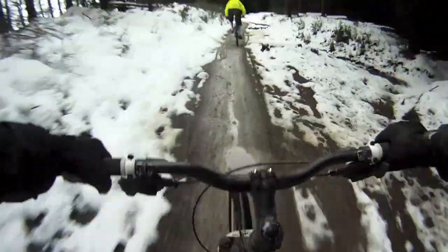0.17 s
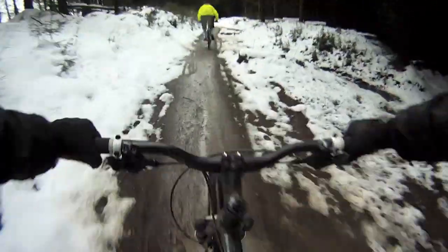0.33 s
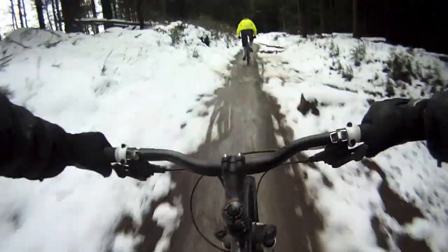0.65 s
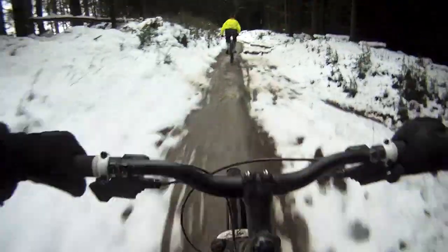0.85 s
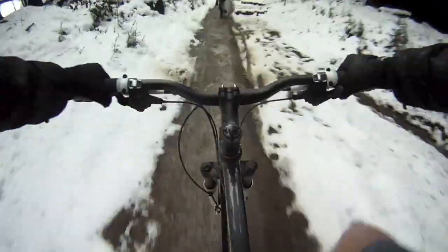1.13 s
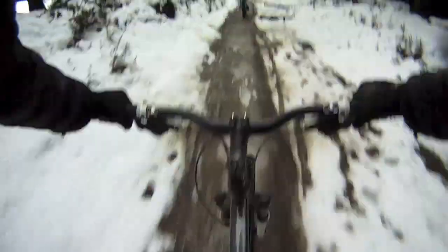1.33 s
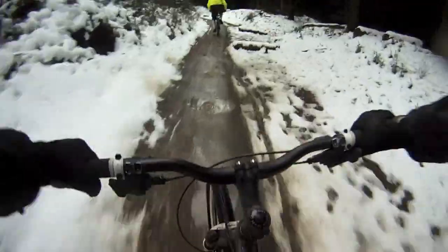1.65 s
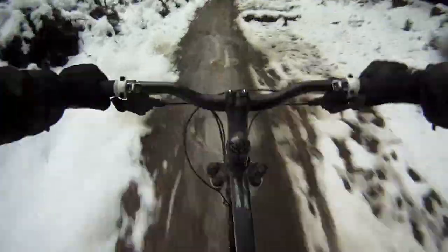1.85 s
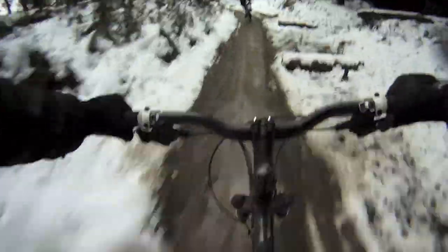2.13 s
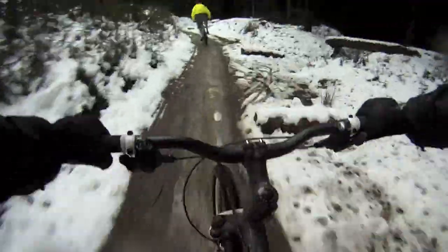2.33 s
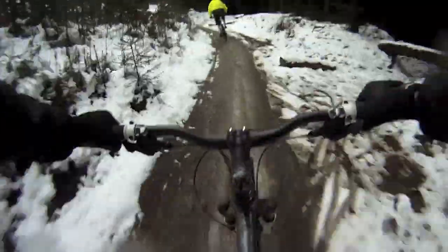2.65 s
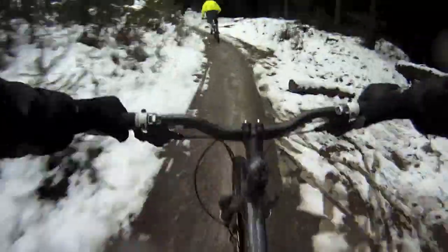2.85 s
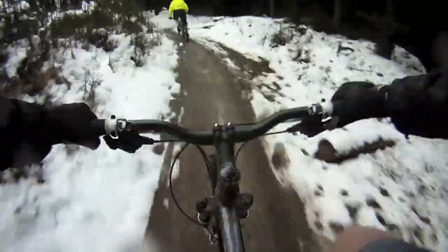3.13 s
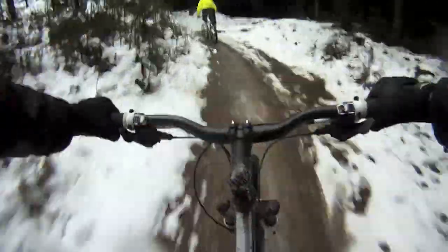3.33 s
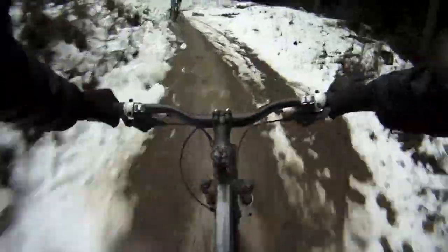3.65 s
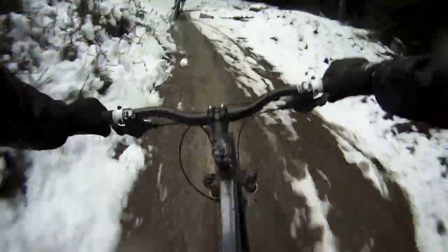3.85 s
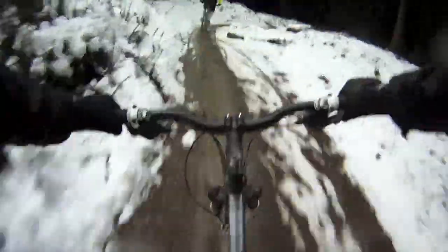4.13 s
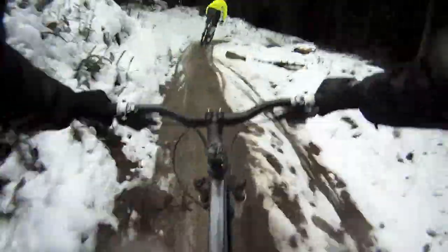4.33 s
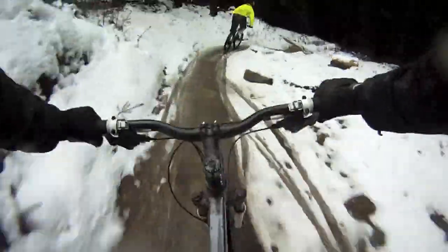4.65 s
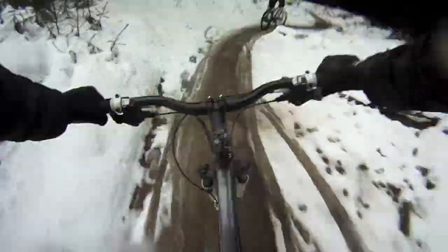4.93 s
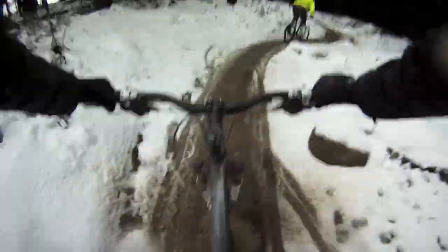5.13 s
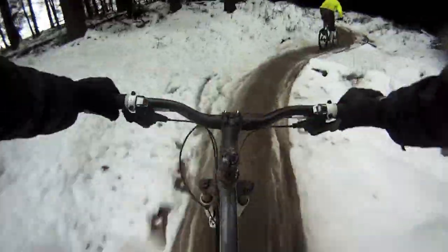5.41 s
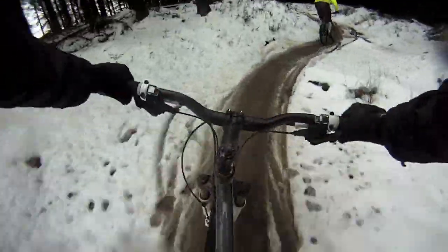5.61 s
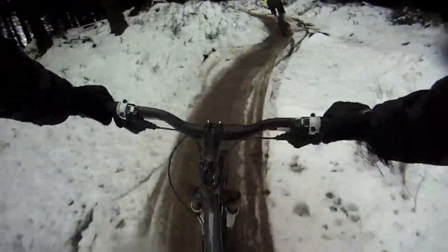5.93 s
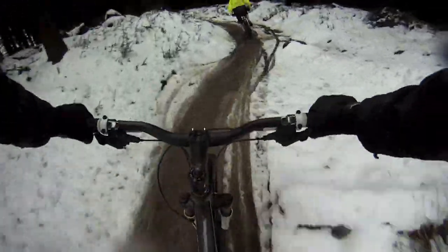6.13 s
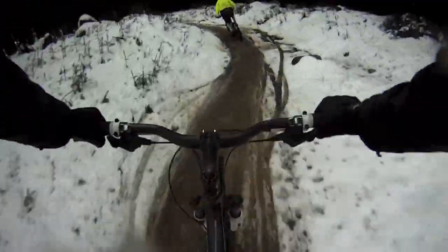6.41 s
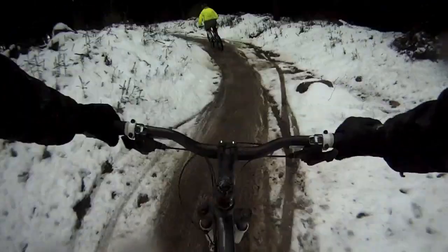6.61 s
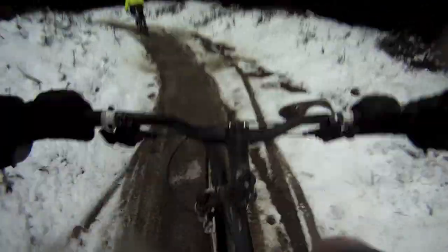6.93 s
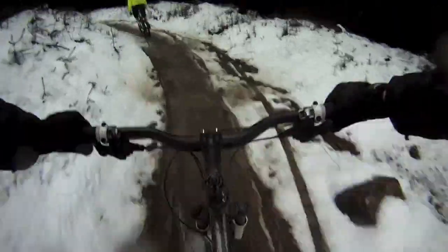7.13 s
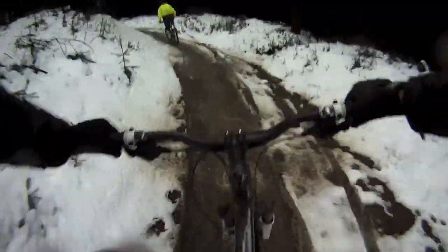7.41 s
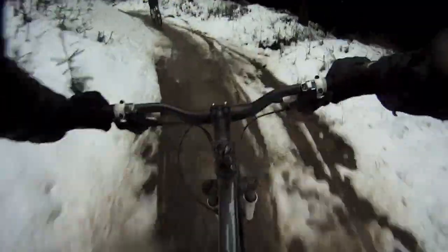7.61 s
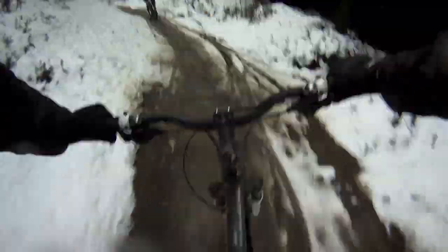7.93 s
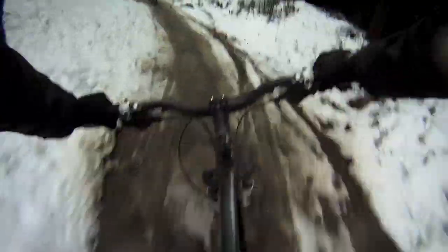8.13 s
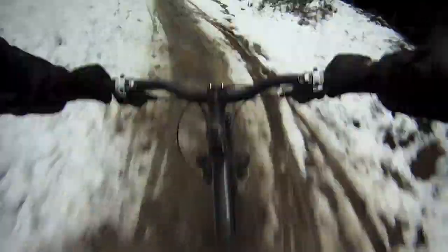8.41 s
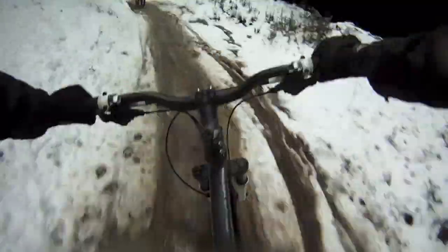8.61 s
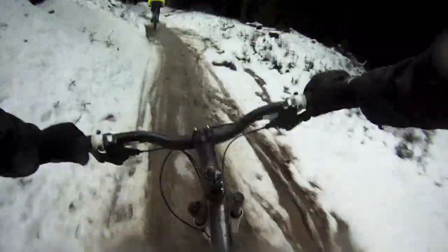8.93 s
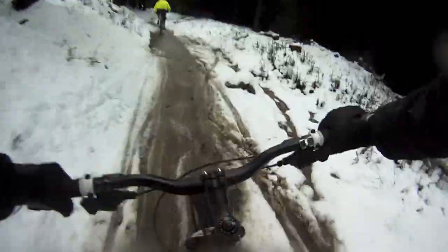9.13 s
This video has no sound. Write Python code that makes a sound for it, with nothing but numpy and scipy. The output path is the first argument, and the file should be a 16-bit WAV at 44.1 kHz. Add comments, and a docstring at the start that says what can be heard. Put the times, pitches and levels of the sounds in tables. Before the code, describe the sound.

A mountain bike rattles down a slushy trail, tyres crunching and spraying wet snow, its camera case clacking, then knocking hard over rough bumps.

```python
"""A mountain bike rolls down a slushy trail for nine seconds, heard from a cased camera on the rider's chest.
First the tyres crunch under light clacks; a hard knock comes at 2.6 s, and the wind swells after 3 s.
The ride quietens before 6 s, then wet spray surges; hard jolts and the hardest knocks fill 6.9 to 9 s.
Contacts are sums of damped modes, snow is random grains through filters, wind is filtered noise with
pressure swings, padded bumps are decaying sines; gain control and soft overload act on the sum."""
import sys
import numpy as np
from scipy import signal
from scipy.fft import rfft, irfft, next_fast_len
from scipy.io import wavfile

SR = 44100
rng = np.random.default_rng(int(sys.argv[2]) if len(sys.argv) > 2 else 0)


def persist_wave(psi):
    """Save psi, clipped to +-1, as 16-bit WAV."""
    counts = np.round(np.clip(psi, -1, 1) * 32767).astype(np.int16)
    wavfile.write(sys.argv[1], SR, np.atleast_2d(counts).T)


N = 408366
TIME = np.arange(N) / SR
# Table levels are relative; clacks, knocks, ticks, clinks, rolling and wind are trimmed where they are played.


def from_db(db):
    """Decibel law: level to amplitude ratio."""
    return 10 ** (np.asarray(db) / 20)


def rms_one(x):
    """Normalisation to unit mean power."""
    return x / np.sqrt(np.mean(x ** 2) + 1e-20)


def in_time(rows):
    """Linear interpolation: each column of a curve, sample by sample."""
    times, *columns = np.transpose(rows)
    return [np.interp(TIME, times, column) for column in columns]


def add(track, s, sound):
    """Superposition: mixes a sound in at time s, in seconds."""
    at = int(np.clip(round(s * SR), 0, N - 1))
    track[at:at + len(sound)] += sound[:N - at]


def blow(modes, thud_db, bright_db, ring_db, crack_db, sizzle_db):
    """Modal synthesis of an impact: damped modes plus friction noise; the mid modes carry 10 ms at rms 1."""
    hz, db, t60 = np.transpose(modes)
    t = TIME[:1300]   # 29 ms are kept
    low = hz < 420
    bright = (hz > 1600) & (hz < 7800)
    high = hz > 7800
    # each blow strikes the modes a little differently
    strength, detune = rng.standard_normal((2, len(hz)))
    gain = from_db(db + thud_db * low + bright_db * bright + ring_db * high + 2 * strength)
    pitch = hz + .022 * np.clip(hz, 800, 2500) * detune
    # the upper modes reach the microphone a fraction of a millisecond apart
    lag = rng.uniform(0, .0005, len(hz)) * (hz > 1600)
    age = np.maximum(t - lag[:, None], 0)
    decay = np.exp(-np.log(1000) * age / t60[:, None])
    rings = -gain[:, None] * np.sin(2 * np.pi * pitch[:, None] * age) * decay
    mid_modes = rings[~low & ~high].sum(0)
    size = np.sqrt(np.sum(mid_modes ** 2) / (.01 * SR))
    # the faces grind as they meet: a dull crack, and a sizzle of crowded plate modes
    grit = rng.standard_normal((2, len(t)))
    dull_noise = rms_one(signal.lfilter([1], [1, -1.5, .62], grit[0]))
    treble_noise = rms_one(signal.lfilter([1, 0, -1], [1, .15, .45], grit[1]))
    crack = from_db(crack_db + bright_db / 3) * dull_noise
    sizzle = from_db(sizzle_db + ring_db) * treble_noise
    grind = np.exp(-t / 0.002) * (1 - np.exp(-t / 0.0011))
    return rings.sum(0) / size + (crack + sizzle) * grind


def blows(rows, modes, crack_db, sizzle_db):
    """Superposition of impacts on one part: rows of (time, level, thud, brightness, ring)."""
    out = np.zeros(N)
    for s, db, thud_db, bright_db, ring_db in rows:
        add(out, s, from_db(db) * blow(modes, thud_db, bright_db, ring_db, crack_db, sizzle_db))
    return out


def contacts(rows, ring_share):
    """Contact stiffness: a harder touch excites the brighter modes, and a share of that the highest modes."""
    return [(s, db, thud_db, hard_db, ring_share * hard_db) for s, db, thud_db, hard_db in rows]


# the faces seldom meet flat: average delay and weakening of the second corner
MEAN_CORNER_DELAY_S, MEAN_CORNER_LOSS_DB = .0032, 10


def second_corners(rows):
    """Double impact: a weaker touch follows each one within milliseconds and makes it ragged."""
    chance = rng.random((len(rows), 2))
    touches = []
    for (s, db, thud_db, hard_db), (late, weak) in zip(rows, chance):
        delay_s = MEAN_CORNER_DELAY_S * (.5 + late)
        loss_db = MEAN_CORNER_LOSS_DB * (.5 + weak)
        touches.append((s + delay_s, db - loss_db, thud_db, hard_db))
    return touches


def chatter(ground_db, per_s, spread_db, count):
    """Random point process: touches grow denser and stronger with the ground; per_s holds at its median."""
    when, luck = rng.random((2, count))
    size, thud, bright, ring = rng.standard_normal((4, count))
    here_db = ground_db[(when * (N - 1)).astype(int)]
    roughness = from_db((here_db - np.median(ground_db)) / 2)
    chance = per_s * TIME[-1] / count * roughness
    level_db = here_db + spread_db * np.clip(size, -2, 1.5)
    rows = np.column_stack([when * TIME[-1], level_db, 4 * thud, 4 * bright, 3 * ring])
    return rows[luck < chance]


# case clacking on its mount: (time [s], level [dB], extra thud [dB], hardness [dB])
CLACKS = [(0.126, -41, -6, -8), (0.2294, -32.5, -10, 0.5), (0.4864, -21.5, 10.5, -6.5),
          (0.5888, -16, 8, 3.5), (0.8224, -40.5, -6, 2), (0.8483, -24.5, -4, 5), (0.9716, -39.5, 12, -8),
          (1.1357, -38.5, -3, 8), (1.155, -36, -0.5, -0.5), (1.4243, -33, -3, 6), (1.758, -41, 1, -9),
          (1.8024, -27, 1, 2.5), (2.0264, -29.5, -2.5, 10), (2.2538, -19, -0.5, 9), (2.358, -39, 0.5, 0),
          (2.564, -18, 10.5, -1.5), (2.5888, -33, 7, 0), (2.6036, -24.5, -3.5, 3), (2.7744, -27, 5.5, -7),
          (2.7935, -34, -10, 4), (2.9153, -34, 7, 5), (3.0053, -32, -4, -3), (3.1382, -29, 3.5, 5),
          (3.2054, -39.5, -9, 0), (3.4, -40, -7, 2.5), (3.5252, -33, -2, 4), (3.542, -20.5, 10, 3),
          (3.8764, -42, 5, 6), (3.9963, -20, -4, 7), (4.1223, -30, -5.5, 0.5), (4.2227, -32, -7, 2),
          (4.3382, -30.5, -7, 4), (4.494, -30.5, 12, 0), (4.6266, -37.5, 11, -6), (4.662, -29, -5.5, 1),
          (4.743, -35, -9, -3), (5.0137, -24.5, 4, 0), (5.0619, -28.5, -2, 2.5), (5.095, -37, 11.5, -4),
          (5.2337, -31, 0, 0.5), (5.2848, -20.5, -7, 0), (5.4179, -40, -8.5, 2), (5.9748, -26, 7.5, 1),
          (6.0568, -39.5, 4, 3.5), (6.574, -31, 4, 2), (6.6234, -31.5, 12, -7), (6.6687, -27, 7, -0.5),
          (7.0628, -28.5, -3, 2), (7.0867, -29, 4, 0.5), (7.2046, -36, -4.5, 3), (7.3208, -25, 8, 6),
          (7.3352, -32.5, 13.5, 2), (7.4284, -35.5, -1, 7.5), (7.576, -33.5, 9, -3), (7.7138, -30, 5, 3),
          (8.0104, -21.5, -2.5, 4), (8.3864, -21.5, 4, -1), (8.7686, -33, 5, -7), (8.792, -26, 8, -4),
          (8.936, -31.5, 14.5, 3)]
# case knocking on its stop: (time [s], level [dB], extra thud [dB], hardness [dB])
KNOCKS = [(0.5155, -15, -2, -2.5), (0.525, -35, 9, -1), (1.2623, -39, 8, 4), (2.0085, -20.5, 9, -9),
          (2.6127, -7, -11.5, -16), (3.303, -31, 11.5, -1), (4.255, -33.5, 7.5, 8),
          (4.8686, -38, 16.5, -13.5), (5.284, -27, 10.5, -9.5), (6.7017, -22.5, 4, -29),
          (6.7937, -30.5, 0, -13.5), (6.8351, -27, 2, -21), (6.874, -17, -22, -13), (6.9387, -24.5, 7, 6),
          (7.108, -15.5, 7.5, -3), (7.555, -19, -3.5, -30), (7.687, -32.5, 13.5, -7),
          (7.8414, -20.5, -8, -3), (7.8856, -35.5, 8, -4), (7.9001, -3.5, -8, 2), (7.9179, -14.5, -20, -7),
          (7.9722, -21, 5, -13), (8.076, -7, -18, -3.5), (8.0872, -26, -11.5, -11),
          (8.127, -25.5, -10, -30), (8.2666, -6.5, 1, -1.5), (8.277, -27, 4, -2), (8.4036, -24.5, 4, 3.5),
          (8.409, -31, -5, -16), (8.417, -23.5, -5, -28), (8.5624, -7.5, -4.5, -0.5),
          (8.578, -24.5, -4, -20), (8.8192, -17.5, 2.5, -4.5), (8.835, -28.5, -8, -9),
          (9.1105, -32, 6.5, -13)]
# latch ticking: (time [s], level [dB])
TICKS = [(2.3853, -40), (2.8247, -24.5), (3.5524, -26.5), (4.0218, -30.5), (5.3032, -31.5), (8.0231, -16.5),
         (8.306, -34)]
# chain and cables clinking: (time [s], level [dB])
CLINKS = [(0.6285, -49), (1.2946, -51.5), (2.0256, -35), (3.316, -45.5), (3.412, -50), (4.0221, -25.5),
          (4.345, -43), (5.291, -41), (6.893, -40.5), (7.575, -45.5), (8.19, -41), (8.249, -44.5),
          (8.482, -40), (8.745, -44.5), (8.94, -44)]
# what each contact rings with: (nominal frequency [Hz], level [dB], decay by 60 dB [s])
CLACK_MODES = [(158, -7.5, 0.05), (257, -17.5, 0.049), (591, -12, 0.11), (648.6, 1.5, 0.038),
               (865, -7.5, 0.059), (956, -9, 0.052), (1437, -12, 0.045), (1813, 7, 0.014),
               (2110, 3.5, 0.023), (2360, -1.5, 0.014), (2400, -29, .013), (3540, -11, 0.023),
               (4940, -18.5, 0.0062), (6530, -32, 0.01), (8930, -14.5, 0.016), (9870, -7, 0.021),
               (10220, -4.5, 0.0071), (13200, -11, .013), (14250, -10, 0.026)]
KNOCK_MODES = [(126, -31, 0.035), (191, -14.5, 0.041), (375, 0, 0.0071), (580, -11.5, 0.011),
               (853, -7.5, 0.0085), (1152, -4.5, 0.019), (1240, -2, 0.024), (1864, -8.5, 0.021),
               (2280, -17, 0.028), (3500, -8, 0.0055), (4680, -7, 0.0031), (7230, -22, 0.0076),
               (8380, -27, 0.02), (10715, -12.5, 0.014), (13500, -15.5, 0.017)]
TICK_MODES = [(200, -0.5, 0.034), (850, -44, .01), (1730, -17, .016), (2140, 3.5, 0.014),
              (2525, -14.5, 0.045), (3495, 1, 0.018), (5100, -9, 0.01), (6780, -13.5, 0.02),
              (8460, -10, 0.017), (9940, -16.5, 0.022), (14400, -12, 0.01)]
CLINK_MODES = [(2150, 6, 0.029), (3400, -35, 0.012), (4876, 5.5, 0.012), (5220, 4, 0.022),
               (5420, -4, 0.0036), (6600, 7, 0.0092), (7100, 3, 0.016), (10000, -2, 0.015)]
# share of a contact's hardness that also reaches the highest modes
CLACK_RING_SHARE, KNOCK_RING_SHARE = 0.89, 0.064
TICK_THUD_DB, TICK_BRIGHT_DB, TICK_RING_DB = -7, 1, 6


def rattles(crunch_db):
    """Impact excitation of resonant bodies: the case and the bike, shaken by the trail."""
    clack_rows = contacts(CLACKS + second_corners(CLACKS), CLACK_RING_SHARE)
    knock_rows = contacts(KNOCKS, KNOCK_RING_SHARE)
    tick_rows = [(s, db, TICK_THUD_DB, TICK_BRIGHT_DB, TICK_RING_DB) for s, db in TICKS]
    clink_rows = [(s, db, 0, 0, 0) for s, db in CLINKS]
    clacks = from_db(1.92) * blows(clack_rows, CLACK_MODES, crack_db=-14.0, sizzle_db=-13.5)
    knocks = from_db(2.0) * blows(knock_rows, KNOCK_MODES, crack_db=-7.5, sizzle_db=-14.0)
    ticks = from_db(3.4) * blows(tick_rows, TICK_MODES, crack_db=-3.5, sizzle_db=-21)
    clinks = from_db(7.5) * blows(clink_rows, CLINK_MODES, crack_db=9, sizzle_db=-13)
    # small random touches between the larger ones
    clack_touches = chatter(crunch_db, per_s=24, spread_db=3.5, count=700)
    small_clacks = blows(clack_touches, CLACK_MODES, crack_db=4.5, sizzle_db=-9)
    knock_touches = chatter(crunch_db, per_s=17, spread_db=2.5, count=350)
    small_knocks = blows(knock_touches, KNOCK_MODES, crack_db=-18, sizzle_db=-10)
    clink_touches = chatter(crunch_db, per_s=11, spread_db=6.5, count=250)
    small_clinks = blows(clink_touches, CLINK_MODES, crack_db=1, sizzle_db=-13)
    small = from_db(1.0) * small_clacks + from_db(-6.0) * small_knocks + from_db(-5.5) * small_clinks
    return clacks + knocks + ticks + clinks + small


# the load builds before each blow, settles after it and grows with its strength (dB per dB)
LOAD_RISE_S, LOAD_SETTLE_S, LOAD_FOLLOWS = 0.026, 0.02, 0.42
LOAD_FULL_DB = -17.5   # the suspension takes up whatever is harder than this


def tyre_load():
    """Power addition: the bump behind each clack and knock presses on the tyres in a quick swell."""
    power = np.zeros(N)
    t = TIME[:SR // 2] - .1
    swell = np.exp(np.minimum(t / LOAD_RISE_S, -t / LOAD_SETTLE_S))
    for s, db, _, _ in CLACKS + KNOCKS:
        press = from_db(LOAD_FOLLOWS * min(db, LOAD_FULL_DB)) * swell
        add(power, s + t[0], press ** 2)
    return np.sqrt(power)


def loaded(level_db, load_db, load):
    """Power addition: a rolling level in dB, raised by the load of the bumps."""
    return 20 * np.log10(np.hypot(from_db(level_db), from_db(load_db) * load))


def drift(rate):
    """Random modulation: joins chance knots, rate of them per second, into a curve with rms 1."""
    knots = rng.standard_normal(4096)
    return rms_one(np.interp(TIME * rate, np.arange(len(knots)), knots))


def coloured(x, spectrum, resonances=()):
    """Linear filtering: multiplies the spectrum of x by a smooth curve with humps and dips on it; rms 1."""
    size = next_fast_len(N, real=True)
    hz = np.linspace(1, SR / 2, 8192)
    points, levels = np.transpose(spectrum)
    db = np.interp(np.log(hz), np.log(points), levels)
    for centre, width, height in resonances:
        db = db + height * np.exp(-.5 * ((hz - centre) / width) ** 2)
    gain = np.interp(np.fft.rfftfreq(size, 1 / SR), hz, from_db(db))
    return rms_one(irfft(rfft(x, size) * gain, size)[:N])


def grains(per_s, spread_db):
    """Shot noise: snow crystals and drops as clicks of random time, size and sign."""
    sizes = from_db(spread_db * np.minimum(rng.exponential(1, N), 5)) * rng.choice([-1, 1], N)
    return sizes * (rng.random(N) < per_s / SR)


# smooth spectra of the tyre sounds: (frequency [Hz], level [dB per Hz])
DRONE = [(40, -18), (80, -5), (125, 1), (165, -1.5), (230, -11.5), (350, -34), (600, -48.5), (1500, -48.5)]
CRUNCH = [(150, 0), (330, 1.5), (550, -1.5), (1000, 0), (1500, -4.5), (2200, -9), (2800, -9), (4500, -19.5),
          (9000, -20), (15000, -18.5)]
SPRAY = [(900, -46), (2000, -0.5), (3000, -2.5), (4500, -3), (7000, -2.5), (9000, -15.5), (12000, -13),
         (15000, -21)]
# the case colours what comes from outside: (frequency [Hz], width [Hz], height [dB])
CASE = [(545, 44, 11), (690, 45, 6.5), (760, 24, -22), (856, 110, 7), (975, 75, -1.5), (1400, 520, 3.5),
        (1773, 112, 6), (2150, 254, 10), (3475, 280, 7), (8460, 220, 9.5), (9800, 400, 10.5),
        (12500, 420, -19), (13630, 210, 12.5)]


def tyres(drone_db, crunch_db, spray_db):
    """Filtered shot noise: knobs drum on the ground, tread crushes slush in clumps and flings off spray."""
    drone_level = from_db(drone_db + 3.0 + 4.6 * drift(22))
    drone = drone_level * coloured(grains(per_s=300, spread_db=4.0), DRONE)
    crunch_level = from_db(crunch_db - 2.74 + 5.04 * drift(70))
    crunch = crunch_level * coloured(grains(per_s=1700, spread_db=2.0), CRUNCH, CASE)
    spray_level = from_db(spray_db + 3.0 + 3.7 * drift(40))
    spray = spray_level * coloured(grains(per_s=9000, spread_db=1.5), SPRAY, CASE)
    return drone + crunch + spray


# a wheel slaps into soft slush: (time [s], level [dB])
SPLASHES = [(1.411, -40.5), (2.03, -27.5), (2.805, -36.5), (3.025, -38), (4.037, -33.5), (4.245, -37.5),
            (4.515, -45.5), (5.292, -32), (6.609, -37), (6.925, -60), (7.075, -35), (7.85, -32.5),
            (8.326, -27.5), (8.382, -41), (8.48, -39.5), (8.799, -28), (9.105, -33)]
SPLASH_RISE_S, SPLASH_FADE_S = 0.00057, 0.041


def splashes():
    """Enveloped shot noise: each slap squeezes out a short burst of coarse wet grains."""
    burst = np.zeros(N)
    t = TIME[:8192]
    envelope = (1 - np.exp(-t / SPLASH_RISE_S)) * np.exp(-t / SPLASH_FADE_S)
    for s, db in SPLASHES:
        add(burst, s, from_db(db) * envelope)
    return burst * coloured(grains(per_s=1100, spread_db=4.5), CRUNCH, CASE)


# the case bumps dully against the chest: (time [s], level [dB], pitch [Hz])
THUMPS = [(0.293, -25.5, 300), (1.361, -25.5, 109), (2.478, -26.5, 300), (4.451, -24, 151),
          (4.519, -23.5, 340), (4.626, -21.5, 151), (4.669, -22, 132), (4.925, -26, 345), (5.039, -28, 350),
          (5.313, -19, 300), (5.628, -35, 328), (6.501, -19.5, 234), (6.621, -20, 150), (6.678, -18, 130),
          (7.003, -13, 101), (7.847, -12, 148), (8.218, -22, 202), (8.349, -14, 221), (8.392, -9.5, 140),
          (8.617, -22, 260), (8.844, -15, 130), (9.157, -20.5, 230)]
THUMP_CYCLES, THUMP_RISE_CYCLES = 0.91, 0.071   # time constants of fading and building up, in cycles


def thumps():
    """Heavily damped oscillator: each padded bump is a low note that dies within a few cycles."""
    out = np.zeros(N)
    for s, db, hz in THUMPS:
        cycles = hz * TIME[:4096]
        envelope = (1 - np.exp(-cycles / THUMP_RISE_CYCLES)) * np.exp(-cycles / THUMP_CYCLES)
        add(out, s, from_db(db) * np.sin(2 * np.pi * cycles) * envelope)
    return out


# smooth spectrum of the wind and body shake: (frequency [Hz], level [dB per Hz])
BUFFET = [(8, -12.5), (18, 6.5), (28, -5), (45, -9.5), (70, -21), (120, -26.5), (250, -67), (600, -82)]
# jolts that heave the case: (time [s], peak level [dB], time constant of the upward swing [s])
JOLTS = [(0.134, -28, 0.0081), (1.399, -23, 0.0036), (1.592, -23.5, 0.0061), (1.745, -25, 0.011),
         (1.952, -22.5, 0.011), (2.07, -20, .01), (2.21, -16.5, 0.0077), (2.895, -21.5, 0.0073),
         (3.51, -19.5, 0.011), (4.315, -17.5, 0.0072), (4.774, -23.5, .01), (5.257, -18.5, 0.0088),
         (6.908, -11.5, 0.00093), (7.05, -16, 0.0046), (7.411, -23, 0.0083), (7.812, -17, .01),
         (8.206, -13.5, 0.0089), (8.498, -11, 0.0013), (8.757, -17.5, 0.011), (8.909, -16, 0.0077)]
JOLT_WIDTH_S = 0.0098   # spread of the bell that bounds the dip and the swell after it


def buffeting(buffet_db):
    """Filtered noise for lumpy wind and body shake; at a jolt the pressure dips, then swings up."""
    out = from_db(buffet_db + 5.0) * coloured(rng.standard_normal(N), BUFFET)
    t = np.arange(-.06, .06, 1 / SR)
    for s, db, swing in JOLTS:
        heave = np.tanh(t / swing) * np.exp(-.5 * (t / JOLT_WIDTH_S) ** 2)
        add(out, s + t[0], from_db(db) * heave / heave.max())
    return out


# how hard the ground works the tyres: (time [s], drone of the knobs [dB], crunch of the slush [dB])
GROUND = [(0.0, -51.5, -53), (0.62, -51, -52.5), (1.08, -58, -54.5), (2.06, -49, -49.5), (2.81, -43, -47.5),
          (3.02, -45.5, -47.5), (3.87, -52, -50.5), (4.15, -44, -46), (4.74, -49.5, -49),
          (5.18, -43.5, -46.5), (5.72, -57.5, -56.5), (6.34, -55.5, -53), (6.76, -39, -46),
          (6.99, -37, -39.5), (7.35, -48, -47.5), (8.36, -36, -39.5), (8.87, -48.5, -48.5),
          (9.26, -43.5, -45)]
# how much wet snow the tyres fling off: (time [s], spray hiss [dB])
WETNESS = [(0.0, -59.5), (0.62, -55), (1.11, -59), (2.01, -53.5), (3.89, -59), (4.15, -55), (4.46, -57),
           (5.31, -60.5), (5.62, -63), (5.98, -64.5), (6.4, -49.5), (6.94, -53.5), (7.53, -55.5),
           (8.46, -57.5), (9.16, -55.5), (9.26, -54)]
# wind and body shake on the case: (time [s], buffeting [dB])
WIND = [(0.0, -37), (0.72, -42), (0.93, -43.5), (2.01, -40.5), (2.6, -41), (3.63, -32.5), (5.05, -41.5),
        (5.36, -33.5), (5.7, -45), (6.68, -36.5), (6.89, -33), (9.26, -37)]
LOAD_DRONE_DB, LOAD_CRUNCH_DB = -35, -37


def scene():
    """Superposition of all sources at one microphone in the case, which feeds both channels."""
    drone_db, crunch_db = in_time(GROUND)
    spray_db, = in_time(WETNESS)
    buffet_db, = in_time(WIND)
    load = tyre_load()
    drone_db = loaded(drone_db, LOAD_DRONE_DB, load)
    crunch_db = loaded(crunch_db, LOAD_CRUNCH_DB, load)
    rolling = tyres(drone_db, crunch_db, spray_db) + splashes()
    sound = rolling + thumps() + buffeting(buffet_db) + rattles(crunch_db)
    return np.array([sound, sound])


LIMIT_DB, RECOVERY_DB_PER_S, ATTACK_S = 0, 49, 0.0079   # recovery is that of the held excess
SQUEEZE = 0.33   # share of the held excess that is taken away


def gain_control(x):
    """Dynamic compression: a loud knock pulls the gain down within milliseconds; it creeps back up."""
    over_db = np.maximum(20 * np.log10(np.abs(x).max(0) + 1e-9) - LIMIT_DB, 0)
    recovery_db = RECOVERY_DB_PER_S * TIME
    held_db = np.maximum.accumulate(over_db + recovery_db) - recovery_db
    r = np.exp(-1 / (ATTACK_S * SR))
    smooth_db = signal.lfilter([1 - r], [1, -r], held_db)
    return x * from_db(-SQUEEZE * smooth_db)


NULL_HZ, NULL_Q, NULL_DEPTH = 6050, 4, 0.77   # a depth of 1 would be a complete null
CUTOFF_HZ = 15600


def record(dry):
    """Saturation and filtering: soft overload after the gain control, a treble dip of the recorder, a cut top."""
    level = gain_control(dry)
    clipped = level / (1 + (level * level) ** 3) ** (1 / 6)
    notched = signal.lfilter(*signal.iirnotch(NULL_HZ, NULL_Q, fs=SR), clipped)
    hollow = clipped + NULL_DEPTH * (notched - clipped)
    return signal.sosfilt(signal.ellip(8, .3, 70, CUTOFF_HZ, fs=SR, output="sos"), hollow)


dry = scene()
out = record(dry)
persist_wave(out)
```